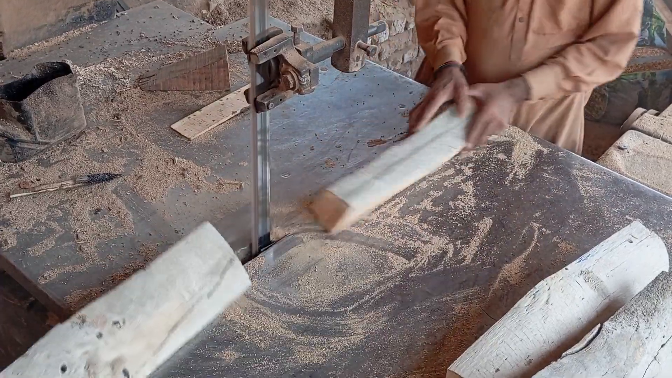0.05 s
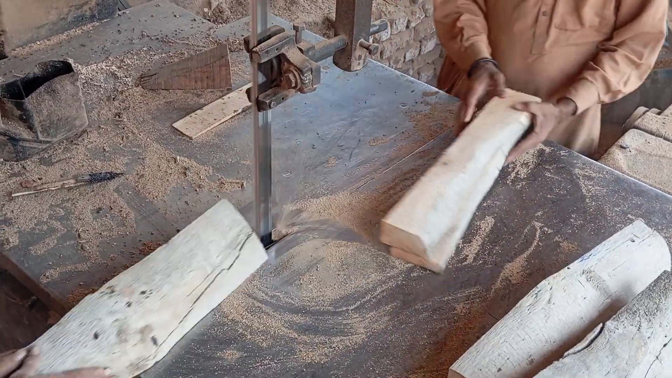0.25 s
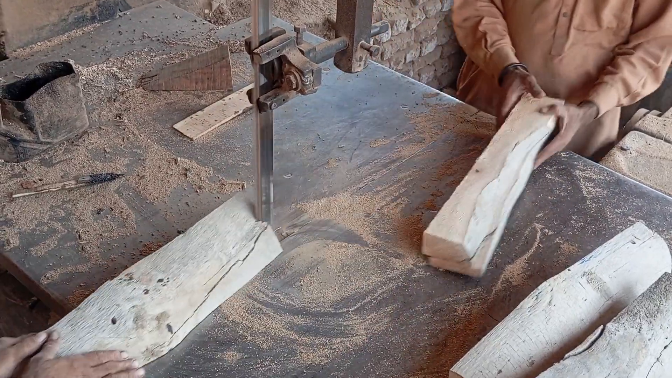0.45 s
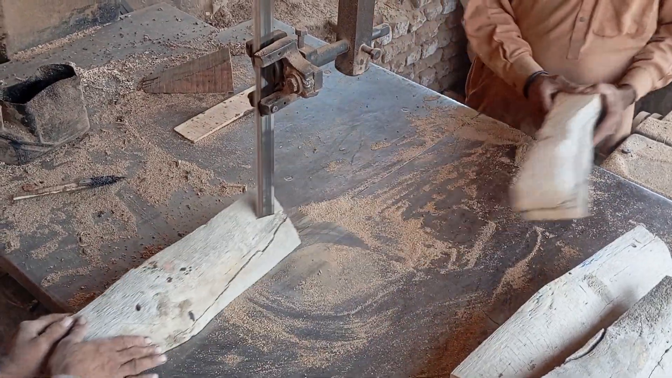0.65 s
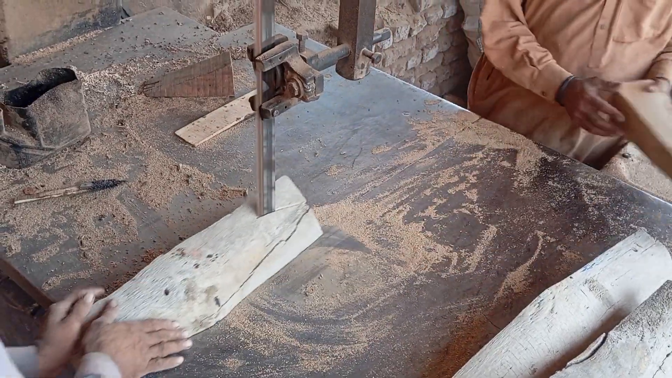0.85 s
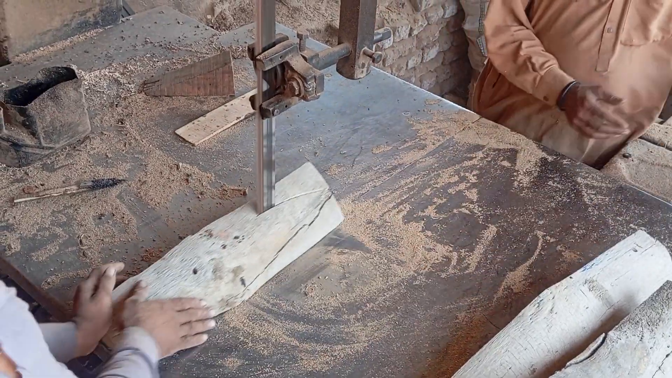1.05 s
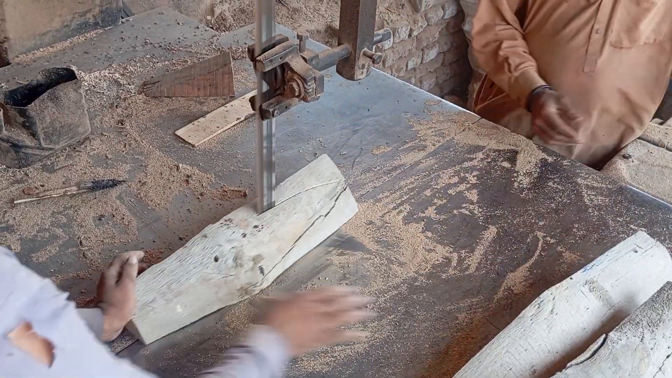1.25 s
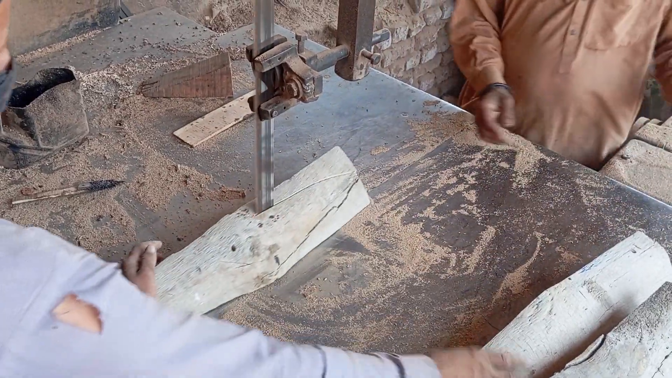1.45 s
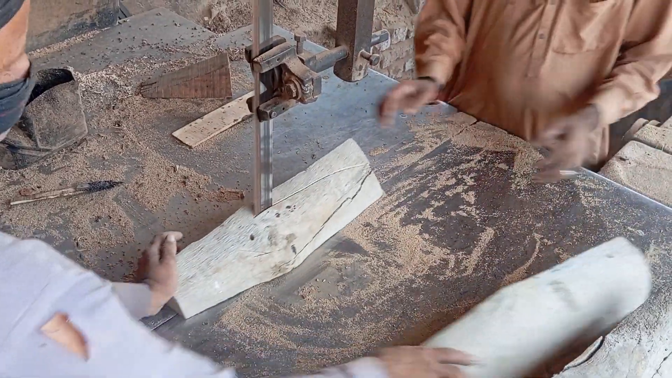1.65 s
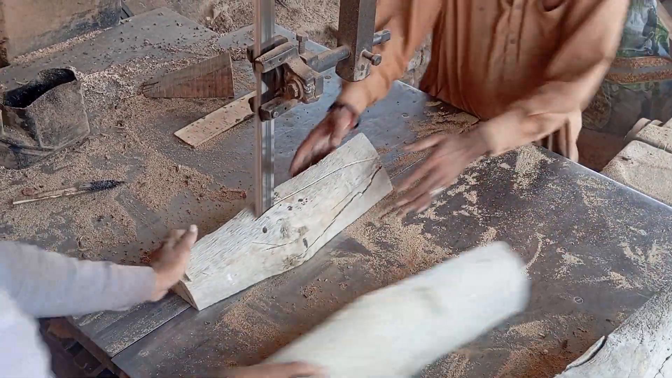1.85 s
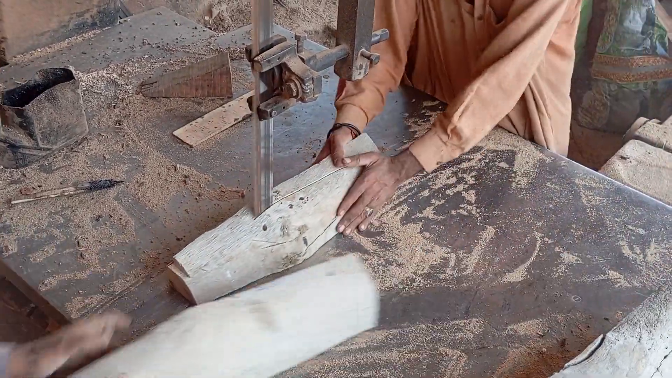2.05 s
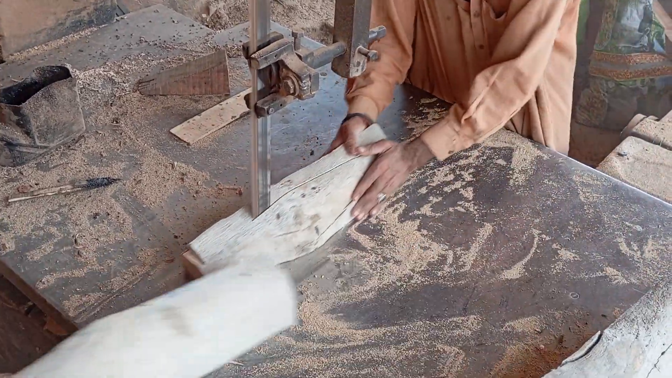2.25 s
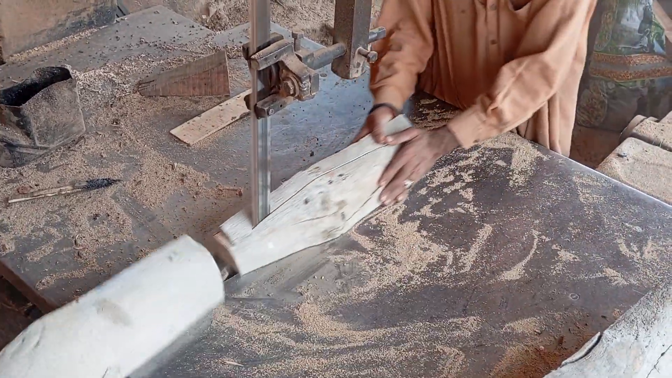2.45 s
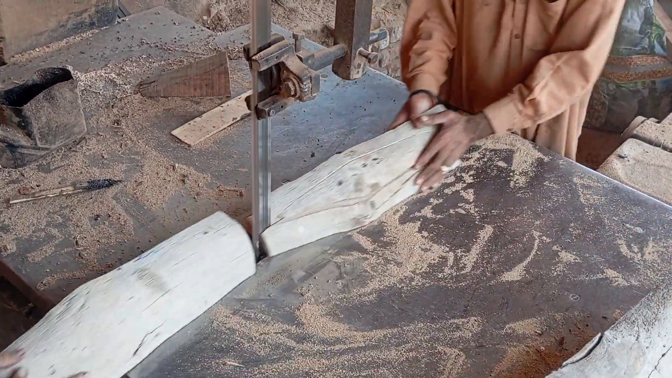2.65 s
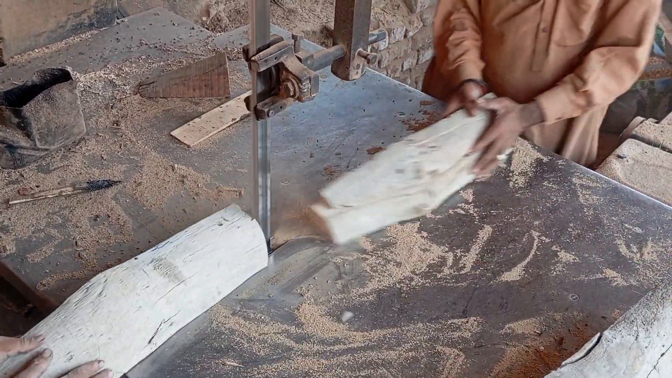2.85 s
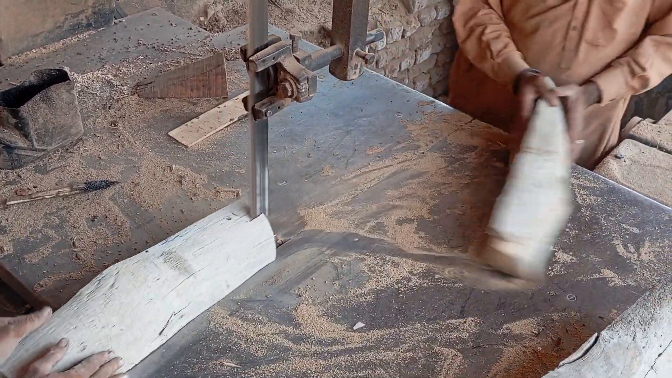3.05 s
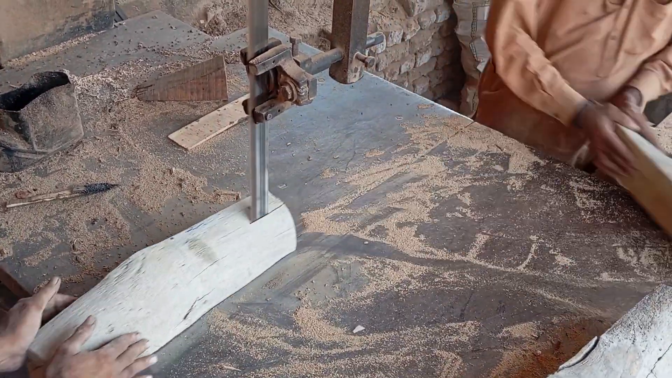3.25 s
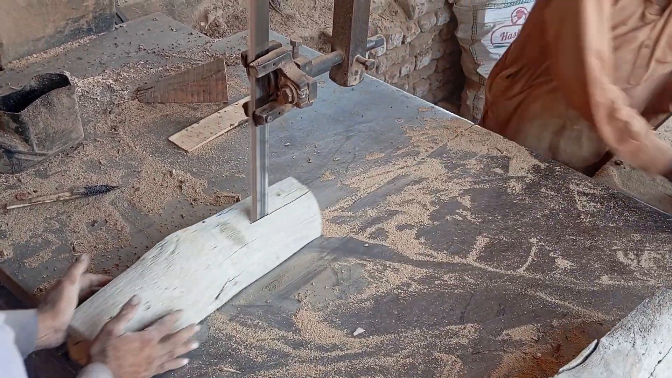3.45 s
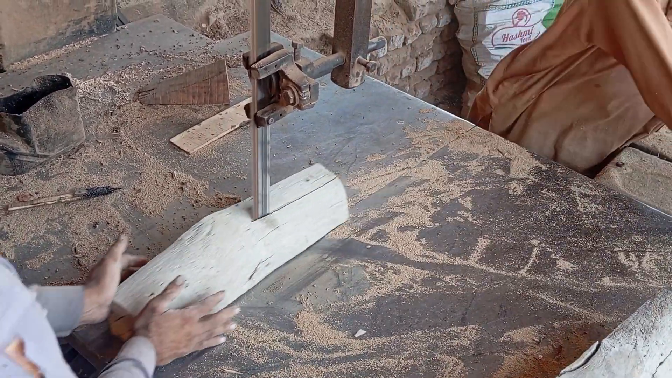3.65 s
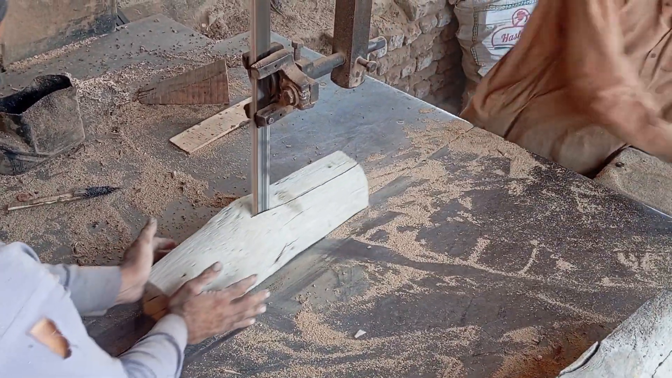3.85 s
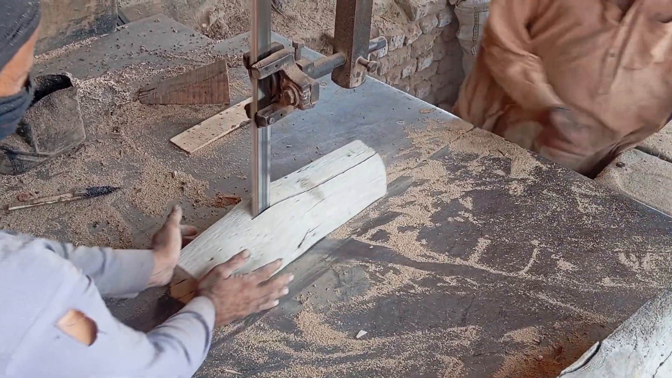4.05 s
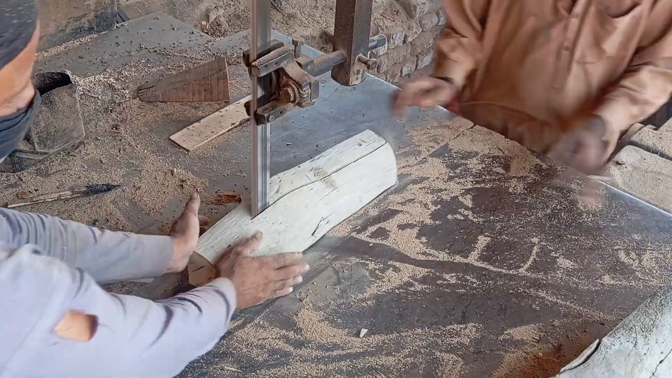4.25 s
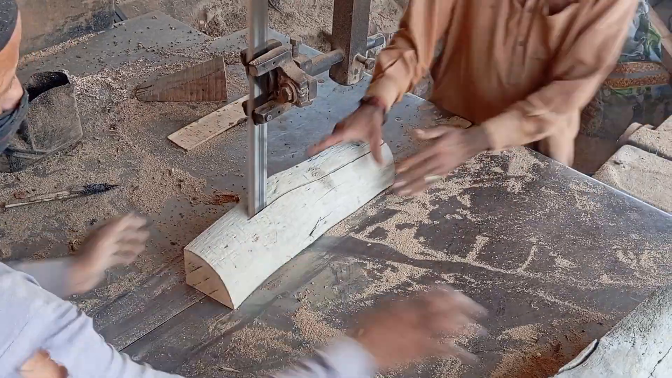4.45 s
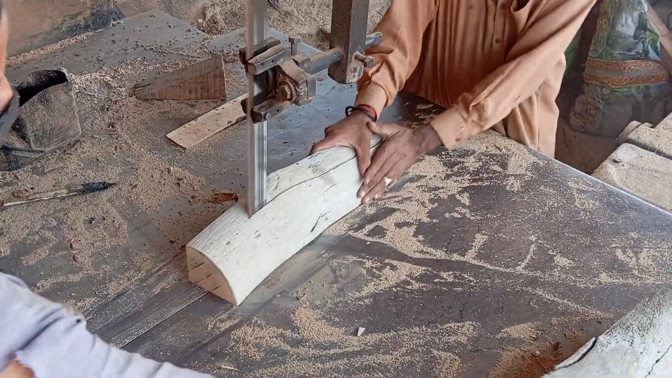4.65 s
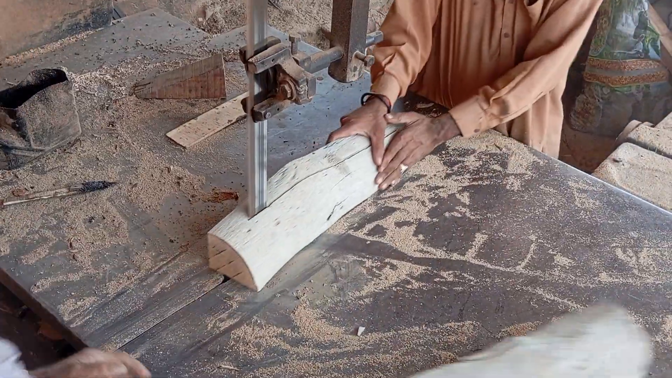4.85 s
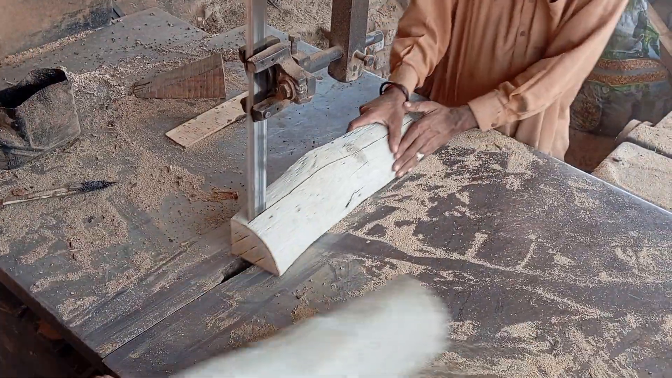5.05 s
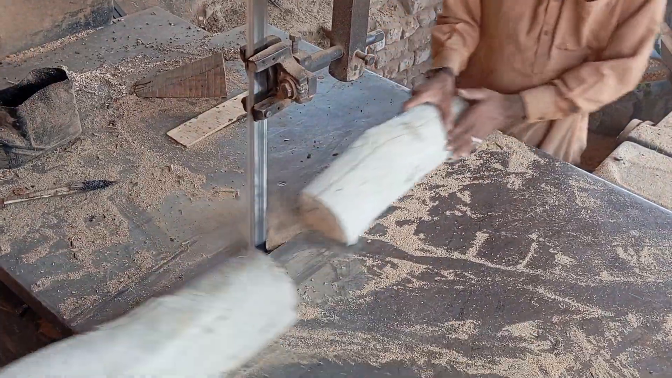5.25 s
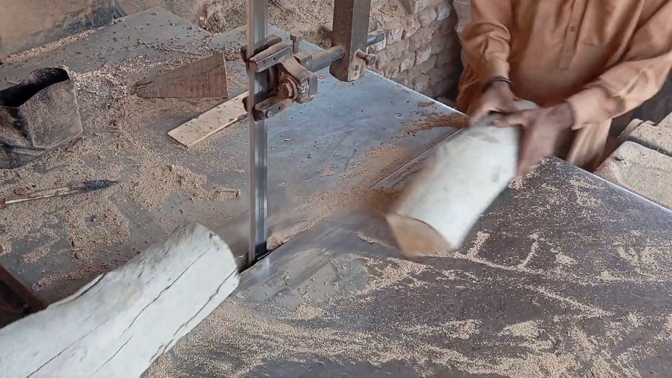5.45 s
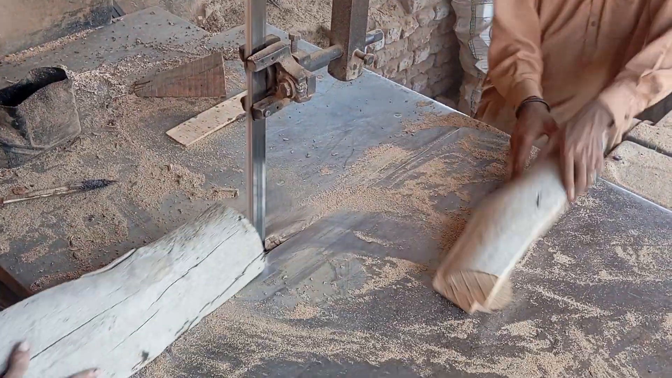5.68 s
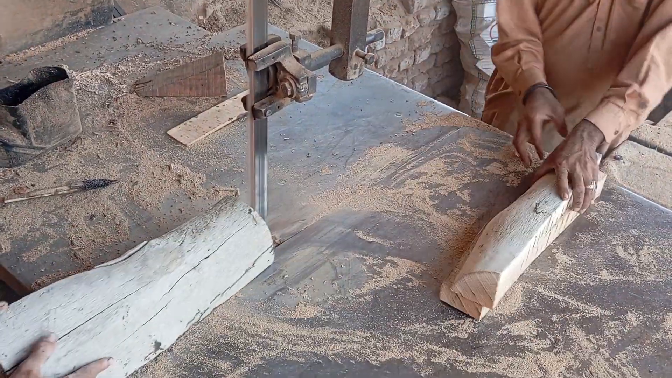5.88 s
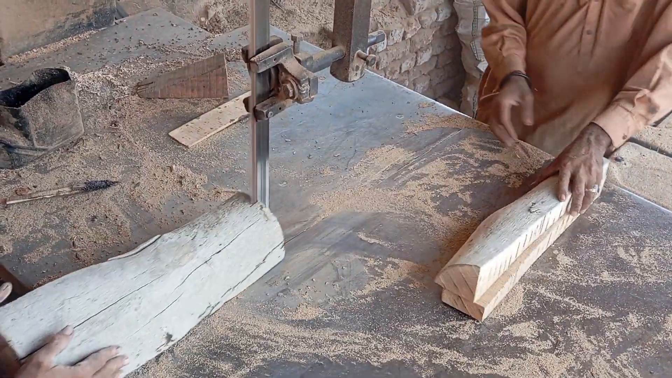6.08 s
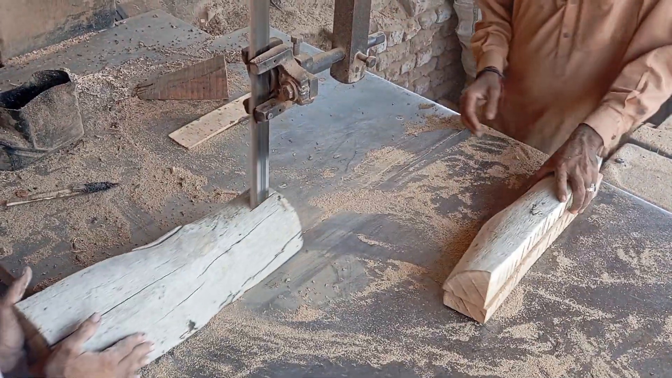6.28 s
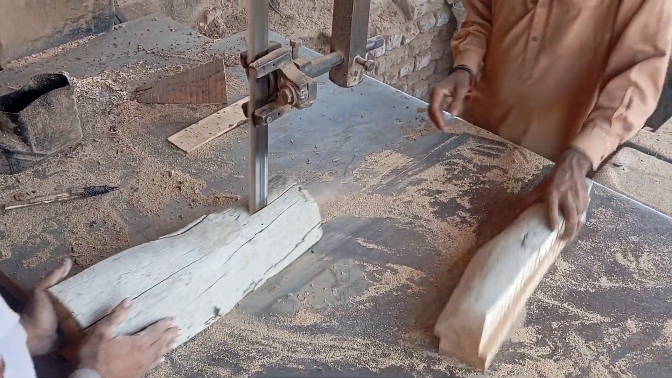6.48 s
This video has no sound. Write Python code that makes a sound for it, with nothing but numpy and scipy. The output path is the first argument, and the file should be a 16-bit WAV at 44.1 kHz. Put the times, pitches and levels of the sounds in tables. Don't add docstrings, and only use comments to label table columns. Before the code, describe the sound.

Close to a running band saw, high steely ringing continues as five wood cuts rasp, with sharp bark ticks and one billet knock.

```python
import sys
import numpy as np
from scipy import signal
from scipy.fft import rfft, irfft, next_fast_len
from scipy.io import wavfile
from scipy.ndimage import uniform_filter1d, map_coordinates

SR = 44100
rng = np.random.default_rng(int(sys.argv[2]) if len(sys.argv) > 2 else 0)


def volts_from_db(level):
    exponent = np.asarray(level, float) / 20
    return 10 ** exponent


def inscribe(sig):
    pcm = np.round(np.clip(np.atleast_2d(sig).T, -1, 1) * 32767)
    wavfile.write(sys.argv[1], SR, pcm.astype(np.int16))


N = 287532

# freq_hz, density_db_per_hz
WHIRR_COLOUR = [(25, -41), (60, -12), (150, 3), (700, 0), (1400, 0), (2200, 6), (3600, 1), (6500, 0.5),
                (8500, 1.5), (9800, -2.5), (12300, -1), (16000, -20)]
# cut_on_hz, edge_hz, tail_hz, level_db
FIRST_MODES = [(1596, 70, 330, -19), (2647, 33, 38, 2), (2703, 30, 173, -7), (2810, 60, 850, -19)]
# cut_on_hz, edge_hz, tail_hz, level_db
GUIDE_MODES = [(1725, 30, 99, 0)]
# cut_on_hz, edge_hz, tail_hz, level_db
SECOND_MODES = [(6918, 36, 89, 2.5), (7110, 89, 570, -1), (7820, 30, 80, -5.5), (8620, 100, 380, -13.5),
                (5260, 97, 130, -12.5), (6000, 50, 260, -9.5), (4410, 45, 250, -13)]
# cut_on_hz, edge_hz, tail_hz, level_db
KERF_MODES = [(7235, 79, 153, 2), (10400, 35, 100, -12.5), (11100, 30, 60, -10)]
# cut_on_hz, edge_hz, tail_hz, level_db
HISS_MODES = [(10300, 60, 350, -6.5), (12950, 200, 950, 1), (14340, 300, 1200, -3)]
# time_s, first_mode_db, guide_contact_db
SWING = [(0, -1, 3), (.2, 1.5, -3), (.245, 0, 10), (.3, 0, 6), (.85, -5, 0), (1.7, 2.5, 0), (1.95, 0, -10),
         (2.04, -5, -8), (2.11, 0.5, -9), (2.7, -3, 0), (2.84, -0.5, 0), (3.2, -0.5, 0), (4.12, 4, 0),
         (4.42, -2, -4), (4.6, -1, -3), (5.0, -2, 2), (5.35, 1, -11.5), (5.95, -1, -1)]
# time_s, drive_db, kerf_pinch_db
DRIVE = [(0, 0, 0.5), (.3, -0.5, 1.5), (.45, -1, -0.5), (.75, 0.5, 2.5), (1.1, -0.5, 0.5), (1.85, -0.5, 1),
         (1.97, -4, 2.5), (2.2, -0.5, -1), (2.55, 1.5, 1.5), (2.78, -1, -1), (3.15, 1.5, 0.5),
         (3.75, 2.5, 1.5), (4.25, 2.5, 0), (4.45, -1.5, 0), (4.68, 0.5, -0.5), (5.8, 1.5, -0.5),
         (6.04, 0, -1), (6.15, 1.5, 0.5)]
# time_s, pitch_hz, level_db, octave_db
SQUEAL = [(.385, 2520, -50, -55), (.41, 2500, -25, -42), (.46, 2500, -25, -42), (.49, 2503, -27, -30),
          (.53, 2510, -36, -28), (.57, 2460, -42, -34), (.6, 2487, -60, -55)]
# time_s, low_hz, high_hz, level_db
SIDE_BURSTS = [(.82, 4500, 5770, -32), (.82, 9500, 11100, -37), (2.467, 8200, 10400, -33),
               (2.606, 10300, 11750, -35), (3.443, 4500, 5750, -34), (3.443, 12300, 14600, -30),
               (3.767, 7450, 9100, -29), (3.767, 11650, 13250, -36), (3.93, 4120, 5800, -31),
               (3.93, 6150, 7700, -27.5), (3.976, 6260, 8900, -25), (3.976, 14350, 15750, -32),
               (4.0, 11650, 13800, -31), (6.205, 14350, 15750, -31), (6.321, 6750, 8340, -25),
               (6.321, 11700, 13900, -34.5)]
# time_s, peak_db, pitch_hz, t60_s
BILLET_KNOCKS = [
    (5.829, -12.5, 1307, 0.074),
    (5.839, -12, 1273, 0.062),
]
# time_s, peak_db
BARK_NICKS = [(1.935, -15), (1.949, -11), (2.16, -2), (2.886, -8), (2.893, -7), (2.92, -8), (2.927, -14),
              (2.934, -1), (2.973, -20), (4.644, -6), (4.654, -16), (4.73, -8), (4.745, -14), (4.76, -12),
              (5.868, -3), (5.885, -2), (5.906, -5), (5.914, -8), (5.928, -17)]
# start_s, length_s, level_db
BARK_GRAZES = [(1.947, .01, -34), (2.16, .014, -25), (2.885, 0.019, -23.5), (2.912, 0.031, -28),
               (4.646, 0.026, -33.5), (4.732, .026, -27), (5.55, 0.045, -35), (5.83, 0.026, -32),
               (5.867, 0.034, -25), (5.901, .018, -21.5), (5.923, 0.019, -23.5)]
# lean_s, bite_s, kerf_full_s, break_out_s, clear_s
CUTS = [
    (.383, .383, .58, 1.845, 1.903),
    (2.1, 2.18, 2.3, 2.71, 2.742),
    (2.87, 2.973, 3.19, 4.3, 4.385),
    (4.63, 4.758, 4.87, 5.19, 5.2),
    (5.86, 5.943, 6.12, 6.6, 6.7),
]
# time_s, force_db
FEED_FORCE = [(.4, 0), (.7, 0), (1.0, 1.5), (1.15, 1), (1.27, -1.5), (1.66, -2), (1.73, 1), (1.8, -1.5),
              (2.3, 0), (2.5, 1.5), (2.7, 0), (3.2, 0), (3.5, 1.5), (4.0, 0), (4.3, 0), (5.0, 0),
              (6.1, 1.5), (6.5, 0.5)]
# freq_hz, density_db_per_hz
CHIP_COLOUR = [(15, -58), (25, -22), (124, -1.5), (308, 0), (764, -0.5), (1540, -4.5), (2230, -9.5),
               (2750, -11.5), (3090, -13), (6060, -23), (6500, -37), (8450, -50), (14300, -120)]

TURNS_PER_S, WELD_TURN = 4.38, .68
FIRST_DB, SECOND_DB, HISS_DB, GUIDE_DB = -19.5, -25, -30, -36
FIRST_DAMP_DB, SECOND_RISE_DB, HISS_RISE_DB = -4.5, 7, 6.5
LEAN_HISS_DB = 5
TOUCH_GRIP, GRIP_LAG_S = 0.53, .008
DUCK_DB, RECOVER_S = -7, 0.056
RASP_DB, LIGHT_DB, EXIT_DB, EDGE_S = -19.5, -6, -3.5, .006
BRIGHT_DB, SHALLOW_BRIGHT_DB = -10, -12
BOOM_DB, SHALLOW_BOOM_DB = -9, 9
NICK_MS = 0.87


def unit(x):
    return x / np.sqrt(np.mean(x ** 2) + 1e-20)


def curves(rows):
    time_s, *columns = np.transpose(rows)
    return [np.interp(np.arange(N) / SR, time_s, column) for column in columns]


def wobble(rate_hz):
    knots = rng.standard_normal(int(N * rate_hz / SR) + 4)
    return map_coordinates(knots, [np.arange(N) * rate_hz / SR])


def lagged(x, lag_s, start):
    keep = np.exp(-1 / (lag_s * SR))
    return signal.lfilter([1 - keep], [1, -keep], x, zi=[keep * start])[0]


def filtered(x, gain):
    size = next_fast_len(N + 8192)
    return irfft(rfft(x, size) * gain(np.fft.rfftfreq(size, 1 / SR)), size)[:N]


def colour(points):
    freq_hz, level_db = np.transpose(points)
    return lambda hz: volts_from_db(np.interp(np.log(hz + 1), np.log(freq_hz), level_db))


def patchy(depth_db):
    grid = signal.stft(rng.standard_normal(N), nperseg=2048)[2]
    broad = uniform_filter1d(rng.standard_normal(grid.shape), size=12, axis=0)
    broad = uniform_filter1d(broad, size=3, axis=1)
    streaks = uniform_filter1d(rng.standard_normal(grid.shape), size=5, axis=1)
    gain_db = depth_db * unit(broad) + 2.86 * unit(streaks)
    return signal.istft(grid * volts_from_db(gain_db), nperseg=2048)[1][:N]


def evened(x, share):
    power = np.abs(uniform_filter1d(x * x, size=2200)) + 1e-3
    return unit(x / power ** (share / 2))


def bent(x, bend):
    read_at = np.arange(N) + np.cumsum(bend - bend.mean())
    return map_coordinates(x, [read_at], order=5, mode="mirror")


def looped(x, depth):
    turn = (np.arange(N) / SR * TURNS_PER_S - WELD_TURN) % 1
    return bent(x, depth * uniform_filter1d(np.sqrt(turn), size=900))


def feed():
    t = np.arange(N) / SR

    def gate(start_s, end_s):
        return np.clip(np.minimum(t - start_s, end_s - t) / EDGE_S + .5, 0, 1)

    leaning = sum(gate(cut[0], cut[-1]) for cut in CUTS)
    contact = sum(gate(cut[1], cut[-1]) for cut in CUTS)
    depth = sum(np.interp(t, np.sort(cut[1:]), [0, 1, 1, 0]) for cut in CUTS)
    leaving = sum(gate(cut[-2], cut[-1]) for cut in CUTS) * (1 - depth)
    cut_db = RASP_DB + curves(FEED_FORCE)[0] + .8 * wobble(11)
    cutting = contact * volts_from_db(cut_db + LIGHT_DB * (1 - depth) ** 2 + EXIT_DB * leaving)
    brushing = sum(volts_from_db(db) * gate(s, s + length_s) for s, length_s, db in BARK_GRAZES)
    brushing = brushing * volts_from_db(2.5 * wobble(140))
    return leaning, depth, 20 * np.log10(cutting + brushing + 1e-3)


def band_levels(leaning, depth, level_db):
    touch = np.clip((level_db + 38) / 8, 0, 1)
    duck_db = DUCK_DB * lagged(touch, RECOVER_S, start=0.66)
    grip = lagged(touch * (TOUCH_GRIP + (1 - TOUCH_GRIP) * depth), GRIP_LAG_S, start=0)
    swing_db, contact_db = curves(SWING)
    drive_db, pinch_db = curves(DRIVE)
    first_db = FIRST_DB + swing_db + FIRST_DAMP_DB * grip + 0.33 * duck_db
    guide_db = GUIDE_DB + contact_db + 0.91 * duck_db
    hiss_db = HISS_DB + drive_db + .5 * wobble(13) + HISS_RISE_DB * grip + duck_db
    lean_db = LEAN_HISS_DB * lagged(leaning, .015, start=0)
    second_db = SECOND_DB + 0.23 * drive_db + pinch_db + SECOND_RISE_DB * grip
    second_db = second_db + 0.86 * duck_db + 0.63 * wobble(14)
    return first_db, guide_db, hiss_db, lean_db, second_db


def singing(modes, depth_db):
    def gain(hz):
        power = 0
        for cut_on_hz, edge_hz, tail_hz, db in modes:
            edge = np.exp(np.clip((cut_on_hz - hz) / edge_hz * 2, -50, 50))
            power = power + volts_from_db(2 * db) / (edge + 1 + ((hz - cut_on_hz) / tail_hz) ** 4)
        return np.sqrt(power)
    return evened(unit(filtered(patchy(depth_db), gain)), share=0.42)


def whirr(effort_db, load, flutter):
    rub = unit(filtered(patchy(0.99), colour(WHIRR_COLOUR)))
    sheen = filtered(rub, lambda hz: 1 / (1 + (9300 / (hz + 1)) ** 8))
    rub = rub + (volts_from_db(1.2 * (load - 0.9)) - 1) * sheen
    return volts_from_db(effort_db + 4.5 - 1.35 * load + 0.53 * flutter) * rub


def first_modes(first_db, load):
    sound = bent(singing(FIRST_MODES, depth_db=.8), .007 * wobble(24))
    sway_db = (-0.4 + 0.93 * load) * wobble(16) + 0.67 * wobble(85)
    return volts_from_db(first_db + 0.64 - 1.7 * load + sway_db) * sound


def guide_modes(guide_db, load):
    return volts_from_db(guide_db + 2 * wobble(25)) * (1 - load) ** 2 * singing(GUIDE_MODES, depth_db=1.5)


def second_modes(second_db, load, flutter):
    free = singing(SECOND_MODES, depth_db=3.0)
    pinched = singing(KERF_MODES, depth_db=0.0)
    sound = looped((1 - .3 * load) * free + .7 * load * pinched, depth=.019)
    return volts_from_db(second_db + 1.3 + 0.63 * flutter + 0.72 * wobble(25)) * sound


def hiss_modes(hiss_db, load, flutter):
    level_db = hiss_db - 1.4 + .3 * load + 0.82 * flutter + 0.48 * wobble(19)
    return volts_from_db(level_db) * singing(HISS_MODES, depth_db=1.3)


def squeal():
    pitch_hz, first_db, octave_db = curves(SQUEAL)
    phase = 2 * np.pi * np.cumsum(pitch_hz + 10 * wobble(70)) / SR
    octave = volts_from_db(octave_db - 2 + 2.5 * wobble(60)) * np.sin(2 * phase)
    return np.sqrt(2) * (volts_from_db(first_db) * np.sin(phase) + octave)


def band(wood):
    first_db, guide_db, hiss_db, lean_db, second_db = band_levels(*wood)
    load = uniform_filter1d(np.clip((wood[-1] + 32) / 12, 0, 1), size=4000)
    flutter = wobble(9)
    out = whirr(0.46 * second_db + .55 * hiss_db, load, flutter)
    out += first_modes(first_db, load) + guide_modes(guide_db, load)
    out += second_modes(second_db, load, flutter) + hiss_modes(hiss_db + lean_db, load, flutter)
    return out + squeal()


def side_bursts():
    side, size = np.zeros(N), 2048
    hz = np.fft.rfftfreq(size, 1 / SR)
    for time_s, low_hz, high_hz, db in SIDE_BURSTS:
        burst = unit(irfft(rfft(rng.standard_normal(size)) * (hz > low_hz) * (hz < high_hz)))
        start = round(time_s * SR) - size // 2
        side[start:][:size] += volts_from_db(db - 1.0) * burst * signal.windows.tukey(size, .7)
    return np.array([side, -side])


def billet():
    out, t = np.zeros(N), np.arange(SR // 8) / SR
    for time_s, db, hz, t60_s in BILLET_KNOCKS:
        ring = np.sin(2 * np.pi * hz * t)
        ring += 0.23 * np.sin(2 * np.pi * .66 * hz * t) + 0.16 * np.sin(2 * np.pi * 0.29 * hz * t)
        out[round(time_s * SR):][:len(t)] += volts_from_db(db - 60 * t / t60_s) * ring * (1 - np.exp(-t / 0.0011))
    return out


def nicks():
    out, t = np.zeros(N), np.arange(SR // 50) / SR
    u = t / (NICK_MS / 1000)
    for time_s, db in BARK_NICKS:
        push = (1 - u) * np.exp(-u) * (1 - np.exp(-2.5 * u))
        push += 0.089 * np.exp(-t / .003) * rng.standard_normal(len(t))
        out[round(time_s * SR):][:len(t)] += volts_from_db(db) * rng.choice([-1, 1]) * push
    return out


def rasp(wood):
    _, depth, level_db = wood
    force_db, = curves(FEED_FORCE)
    bright_db = BRIGHT_DB + SHALLOW_BRIGHT_DB * (1 - depth) + 0.47 * force_db
    boom_db = BOOM_DB + SHALLOW_BOOM_DB * (1 - depth) - 2.4 * force_db
    bite = np.clip((level_db + 33) / 15, 0, 1)
    tears_per_s = 450 + 6000 * bite ** 3
    tears = (rng.random(N) < tears_per_s / SR) * rng.standard_normal(N) / np.sqrt(tears_per_s / SR)
    clumps = volts_from_db((3.5 - 2.8 * bite) * wobble(50) + 1.1 * wobble(260))
    chips = clumps * ((.95 - 0.4 * bite) * tears + (0.24 + 0.5 * bite) * patchy(1.0))
    chips = unit(filtered(chips, colour(CHIP_COLOUR + [(9000, -29), (16000, -45)])))
    chips = evened(chips, share=0.15)
    upper = filtered(chips, lambda hz: 1 / np.sqrt(1 + (2300 / (hz + 1)) ** 4))
    lower = filtered(chips, lambda hz: 1 / np.sqrt(1 + (hz / 300) ** 4))
    harder = volts_from_db(1.37 * np.clip(bright_db + 13, -9, 5)) - 1
    looser = volts_from_db(0.64 * np.clip(boom_db + 6.5, -9, 9)) - 1
    touching = np.clip((level_db + 36.0) / 4, 0, 1)
    return volts_from_db(level_db + 3.0) * touching * (chips + harder * upper + looser * lower)


def scene():
    wood = feed()
    mono = band(wood) + billet() + nicks() + rasp(wood)
    return np.array([mono, mono])


def band_limit(x):
    return signal.sosfilt(signal.butter(12, 17040, fs=SR, output="sos"), x)


def record(dry):
    def band_limits(hz):
        return 1 / (1 + (hz / 15740) ** 900) / (1 + (42 / (hz + 1)) ** 4)

    soft = dry / (1 + np.abs(dry / .82) ** 5) ** (1 / 5) + side_bursts()
    mix = np.array([filtered(channel, band_limits) for channel in soft])
    return band_limit(mix)


dry = scene()
out = record(dry)
inscribe(out)
```